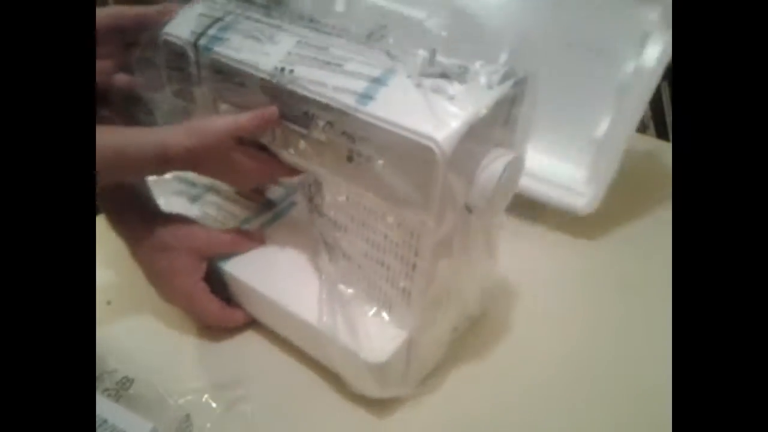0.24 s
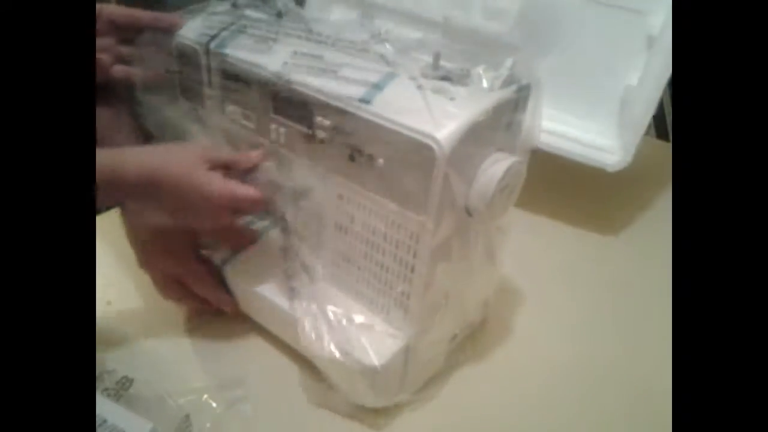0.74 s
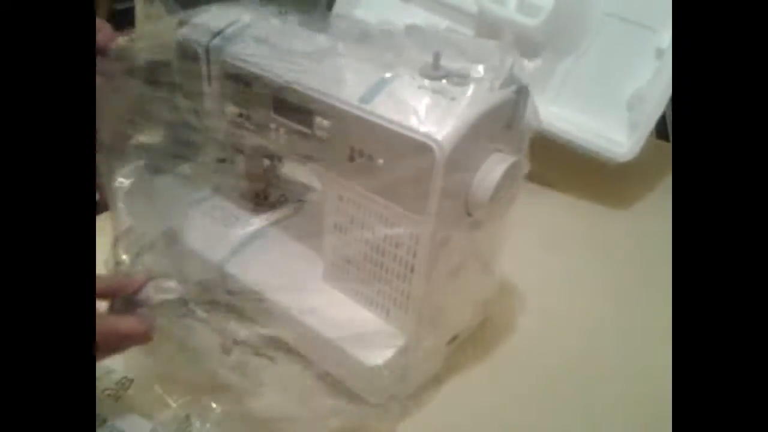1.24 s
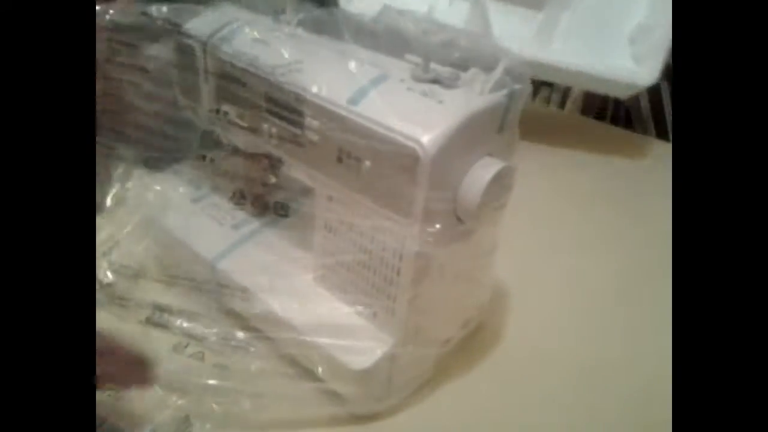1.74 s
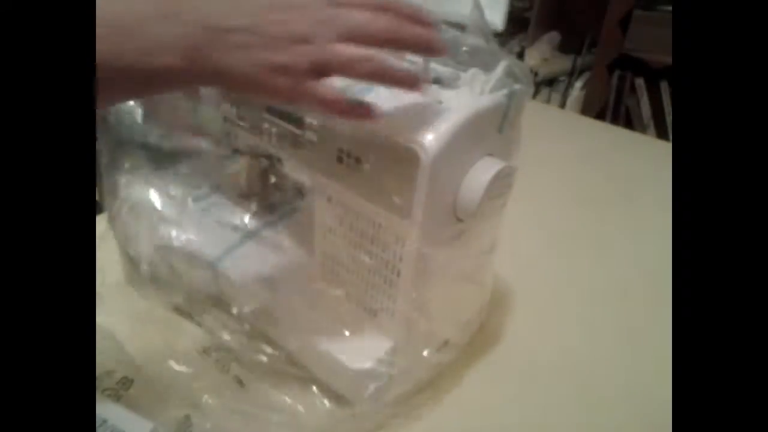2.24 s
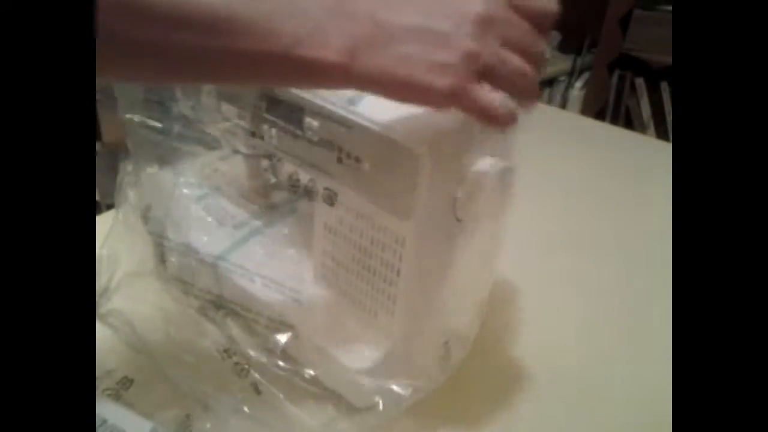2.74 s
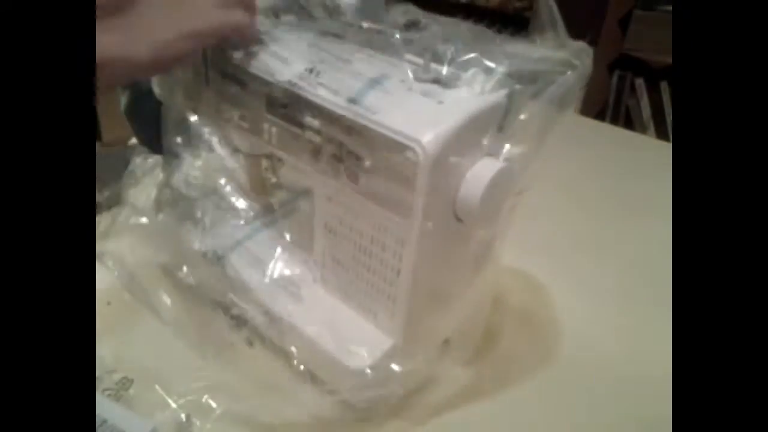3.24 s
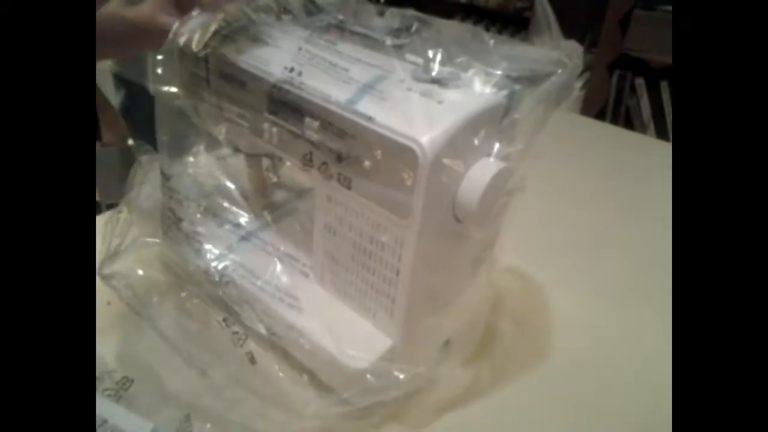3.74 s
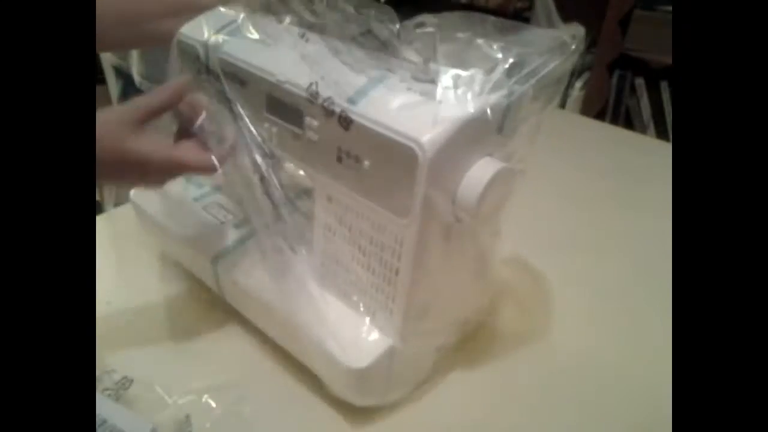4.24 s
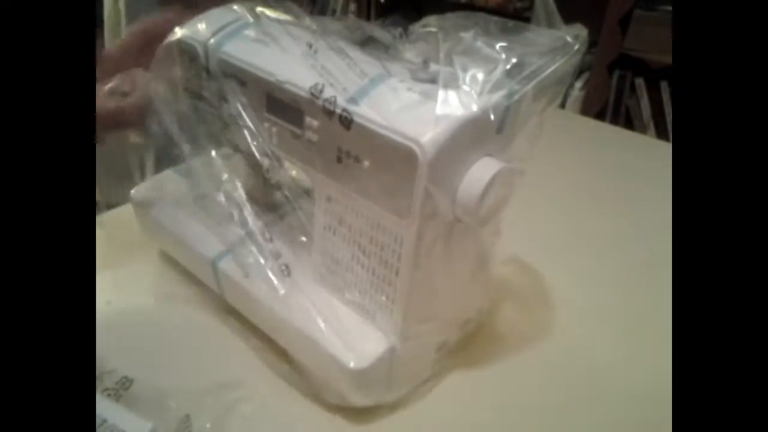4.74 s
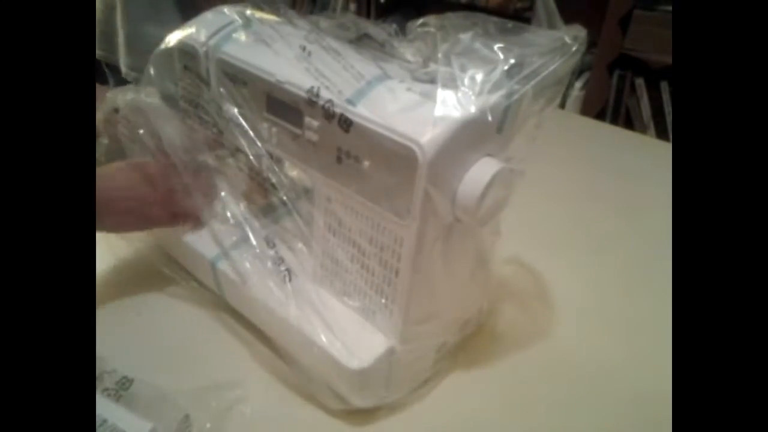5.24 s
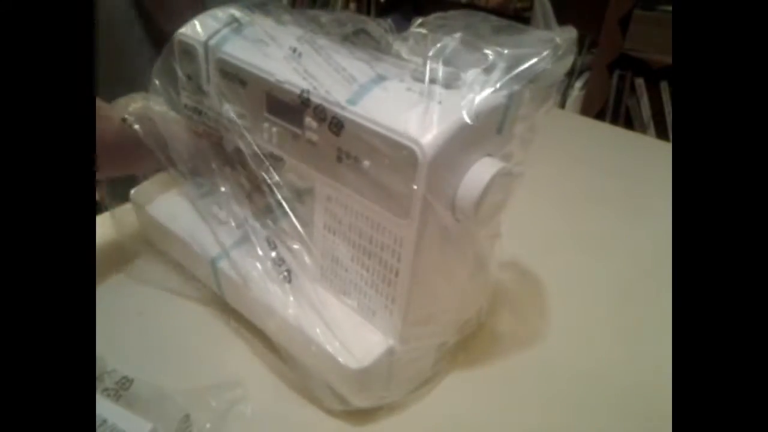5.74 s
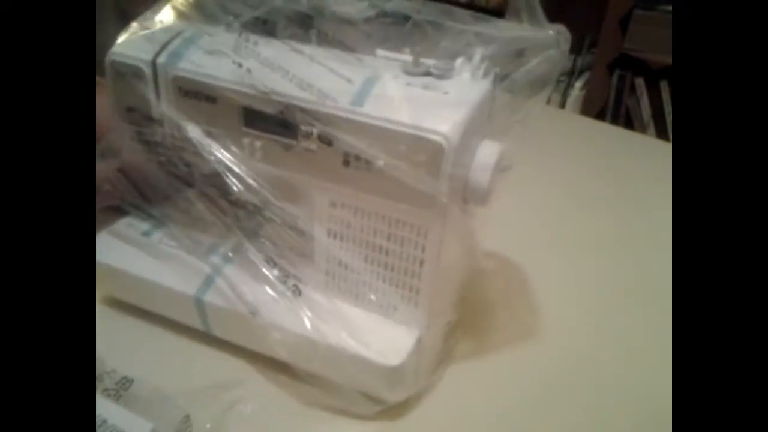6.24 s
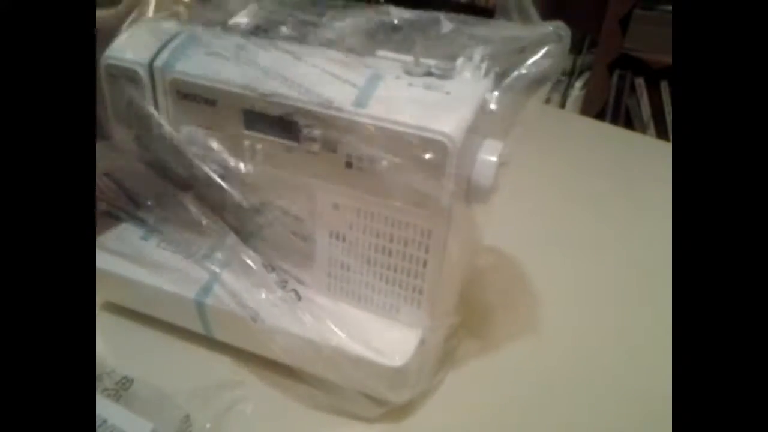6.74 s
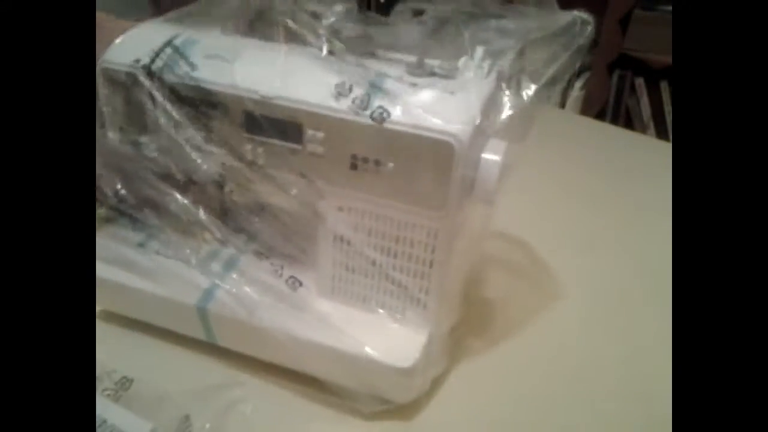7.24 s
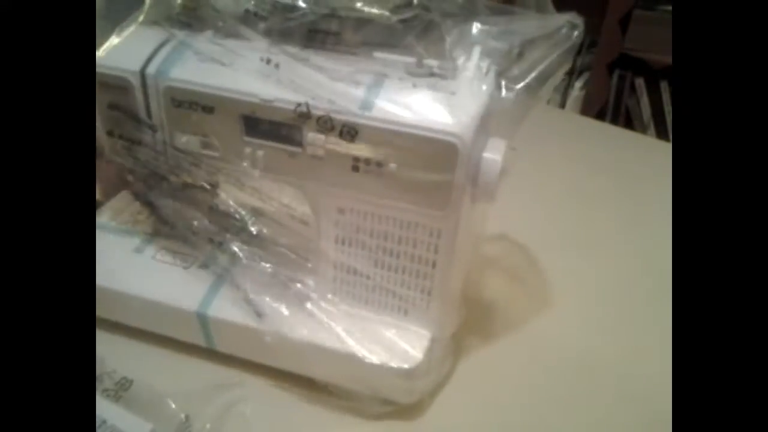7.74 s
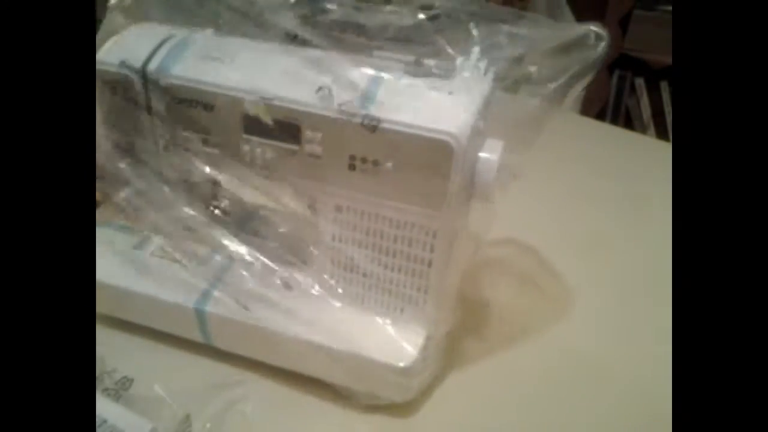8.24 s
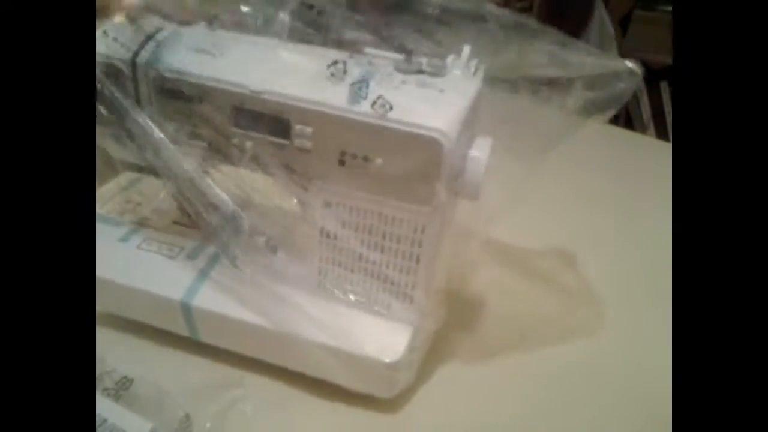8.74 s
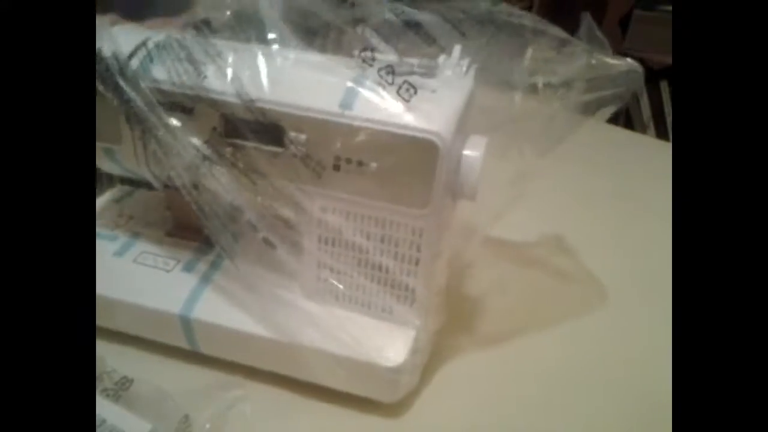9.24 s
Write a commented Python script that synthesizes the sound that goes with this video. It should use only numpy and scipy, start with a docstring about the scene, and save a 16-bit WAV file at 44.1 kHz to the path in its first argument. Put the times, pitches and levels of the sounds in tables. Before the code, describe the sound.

Hands work a thin plastic bag loose from a sewing machine on a table. The film crinkles and rustles throughout in uneven tugs, with sharp little snaps. A soft table thump comes at the start. From about halfway, the hollow housing is knocked and rubbed several times, and one hard tick sounds just before the end. The microphone is close, in a small quiet room.

```python
"""A table in a small room: hands lift a foam shell off a sewing machine and work its plastic bag loose.
Creases in the film buckle in little avalanches of clicks, over the friction hiss of film sliding on itself.
Now and then the hollow housing is knocked or rubbed and rings briefly in its damped modes, and the table
top booms. One hard tick sounds near the end, close to the microphone."""
import sys
import numpy as np
from scipy import signal
from scipy.fft import rfft, irfft
from scipy.io import wavfile
from scipy.ndimage import uniform_filter1d

SR = 44100
rng = np.random.default_rng(int(sys.argv[2]) if len(sys.argv) > 2 else 0)


def to_wav(sig):
    """Store sig (one row per channel, or 1-D mono) as 16-bit WAV at the path in sys.argv[1].

    Samples outside -1..1 are clipped; the rate is SR.
    """
    pcm = np.clip(np.atleast_2d(sig), -1, 1) * 32767
    pcm = np.round(pcm).astype(np.int16)
    wavfile.write(sys.argv[1], SR, pcm.T)  # frames by channels


N = 418950
TIME = np.arange(N) / SR

# modes of the hollow housing on the table: f/Hz, relative level/dB, T60/s
HOUSING_MODES = [(137, -10, 0.27), (200, -7, 0.11), (263, 0, 0.21), (298, -5, 0.08), (380, 2, 0.18),
                 (428, 5, 0.15), (533, -1, 0.18), (572, 0, 0.07), (640, 3, 0.07), (695, 1, 0.1),
                 (815, -1, 0.045), (885, -1, 0.1), (1060, -7, 0.1), (1545, -3, 0.12)]


def undb(db):
    """Amplitude ratio of a level: a factor of ten per 20 dB."""
    return 10 ** (np.asarray(db) / 20)


def rms(x):
    """Effective amplitude: the root of the mean square."""
    return np.sqrt(np.mean(x ** 2)) + 1e-12


def add(track, s, sound):
    """Superposition: a sound joins the track at s seconds."""
    start = max(int(s * SR), 0)
    part = sound[:max(N - start, 0)]
    track[start:start + len(part)] += part


def band(x, lo_hz, hi_hz, order=2):
    """Butterworth band-pass filtering."""
    return signal.sosfilt(signal.butter(order, [lo_hz, hi_hz], "band", fs=SR, output="sos"), x)


def colour(x, points, size=2048):
    """Minimum-phase filtering by a spectrum of (f/Hz, gain/dB) points."""
    hz, db = np.transpose(points)
    bin_hz = np.arange(size // 2 + 1) * SR / size
    gain = undb(np.interp(np.log(bin_hz + 1), np.log(hz), db))
    cepstrum = irfft(np.log(gain))
    cepstrum[1:size // 2] *= 2  # folding the cepstrum makes the filter causal
    cepstrum[size // 2 + 1:] = 0
    return signal.fftconvolve(x, irfft(np.exp(rfft(cepstrum))))[:len(x)]


def ring(modes, t, detune):
    """Free vibration: a sum of damped sinusoids, each slightly detuned at random."""
    out = 0
    for hz, db, t60 in modes:
        detuned_hz = hz * (1 + detune * rng.standard_normal())
        out = out + undb(db - 60 * t / t60) * np.sin(2 * np.pi * detuned_hz * t)
    return out


def walk(per_s):
    """Random modulation: straight lines between Gaussian values, with variance near 1."""
    return np.sqrt(3 / 2) * np.interp(TIME * per_s, np.arange(N), rng.standard_normal(N))


def curve(points):
    """Linear interpolation of (t/s, value) points at every sample."""
    return np.interp(TIME, *np.transpose(points))


def envelope(t, rise, hold, release):
    """Linear rise, hold and exponential decay."""
    return np.clip(t / max(rise, 1 / SR), 0, 1) * np.exp(-np.maximum(t - rise - hold, 0) / release)


def impulses(per_s, spread_db, cap):
    """Poisson process: impulses of either sign, their levels spread by a capped exponential law."""
    happens = rng.random(N) < per_s / SR
    size = undb(spread_db * np.minimum(rng.exponential(size=N), cap))
    return happens * size * rng.choice([-1, 1], N)


def room(x, wet_db=-1, t60=0.25):
    """Reverberation: dense reflections from table and walls decay after the direct sound."""
    t = TIME[:SR // 2]
    wash = rng.standard_normal(len(t)) * undb(-60 * t / t60) * (1 - np.exp(-t / 0.0026))
    return x + undb(wet_db) * signal.fftconvolve(x, wash / np.linalg.norm(wash))[:len(x)]


def room_hush():
    """Ambient noise: faint, steady and strongest near 500 Hz."""
    spectrum = [(25, -36), (80, -37), (160, -18), (500, -11), (2000, -22.5), (12000, -36)]  # f/Hz, gain/dB
    air = colour(rng.standard_normal(N), spectrum)
    return undb(-50) * air / rms(air)


def table_thumps():
    """Plate vibration: a padded weight sets the low modes of the table top booming."""
    # weight landing: t/s, gain/dB
    landings = [(0.23, -25.5), (0.399, -39), (9.327, -35)]
    # table top: f/Hz, relative level/dB, T60/s
    top_modes = [(123, -3, 0.34), (146.5, -1.5, 0.2), (179, -0.5, 0.15)]
    out = np.zeros(N)
    for s, db in landings:
        add(out, s, undb(db) * ring(top_modes, TIME[:SR // 2], detune=0.011))
    return band(out, 105, 260, order=3)


def housing_hum():
    """Friction-driven vibration: a slow drag sustains two housing modes, which waver and creep upward."""
    # sustained modes: starting f/Hz, level/dB
    tones = [(373, -40.5), (536, -47)]
    start_s, glide_per_s = 6.35, 0.16
    out, t = np.zeros(N), TIME[:SR // 2]
    drag = envelope(t, rise=0.07, hold=0.15, release=0.025)
    for hz, db in tones:
        pitch_hz = hz * (1 + glide_per_s * t + .008 * walk(30)[:len(t)])
        gain = undb(db + 2 * walk(23)[:len(t)])
        add(out, start_s, gain * drag * np.sin(2 * np.pi * np.cumsum(pitch_hz) / SR))
    return out


def contact(x, hz):
    """Selective excitation: the place and softness of a contact choose which range of modes rings."""
    return band(band(x, hz / 1.28, hz * 1.31, order=1), hz / 2.87, hz * 3.36, order=3)


def housing_knocks():
    """Impact excitation: a blow rings all the modes, each with a sign set by the spot that is struck."""
    # knocks and rebounds: t/s, level/dB, centre f/Hz
    blows = [(0.230, -20, 430), (0.237, -20, 270), (5.121, -22, 600), (5.127, -15.5, 430),
             (5.155, -24, 480), (5.659, -32, 600), (6.163, -24, 480), (6.262, -12.5, 720),
             (6.273, -11, 560), (6.282, -11.5, 380), (6.303, -18, 400), (7.763, -14.5, 620),
             (7.776, -12.5, 380)]
    out, t = np.zeros(N), TIME[:SR // 2]
    for s, db, hz in blows:
        modes = sum(rng.choice([-1, 1]) * ring([mode], t, detune=.006) for mode in HOUSING_MODES)
        body = contact(modes, hz) * (1 - np.exp(-t / 0.0014))  # the film pads the blow
        crunch = band(rng.standard_normal(len(t)), 880, 1700)  # and is crushed under it
        crunch = undb(-16) * crunch / rms(crunch) * np.exp(-t / 0.03)
        add(out, s, undb(db) * (body / rms(body[:SR // 60]) + crunch))
    return out


def housing_rubs():
    """Stick-slip friction: the grip catches and slips unevenly, ringing the housing, scraping the film."""
    # rubs: t/s, level/dB, hold/s, centre f/Hz, scrape re thud/dB
    strokes = [(0.118, -32, 0.048, 940, -13), (0.141, -38.5, 0.045, 387, -20),
               (0.258, -38.5, 0.087, 330, 3), (0.394, -31.5, 0.016, 980, -25),
               (3.671, -44.5, 0.073, 563, -11), (4.012, -21, 0.027, 583, -22),
               (4.025, -32, 0.0079, 230, -25), (4.164, -32, 0.084, 457, -8), (4.288, -33.5, 0.2, 334, -32),
               (4.397, -27.5, 0.017, 560, -24), (5.048, -34, 0.056, 520, -29),
               (5.19, -34.5, 0.015, 950, -11), (5.355, -17.5, 0.033, 720, -8),
               (5.36, -21.5, 0.0045, 245, -26), (5.422, -33, 0.049, 435, -6.5),
               (5.495, -42, 0.054, 426, -20), (6.756, -37, 0.014, 575, -29), (6.92, -34, 0.051, 560, -27),
               (6.939, -35.5, 0.05, 189, -23), (7.166, -39, 0.027, 654, -18),
               (7.849, -29.5, 0.14, 480, -16), (7.987, -23.5, 0.0061, 553, -14),
               (7.996, -19.5, 0.023, 408, -34), (8.062, -26, 0.066, 420, -39), (8.25, -30, 0.058, 594, -15),
               (9.323, -27, 0.013, 1060, -4), (9.335, -31, 0.026, 453, -2), (9.415, -36, 0.0045, 328, -10)]
    slips_per_s, release_s = 1200, 0.013
    out, t = np.zeros(N), TIME[:SR // 2]
    for s, db, hold, hz, scrape_db in strokes:
        rise = 0.052 * hold
        force = envelope(t, rise, hold - rise, release_s)
        slips = force * rng.choice([-1, 1], len(t)) * (rng.random(len(t)) < slips_per_s / SR)
        slips[0] += 2 * np.exp(-rise / 0.0053)  # a quick landing is a blow
        body = signal.fftconvolve(slips, ring(HOUSING_MODES, t, detune=.01))[:len(t)]
        panel = band(slips, 130, 850, order=3)  # heavily damped panels and the table top
        thud = contact(body / rms(body) + undb(-6) * panel / rms(panel), hz)
        scrape = band(force * rng.standard_normal(len(t)), 820, 1950)
        sound = thud / rms(thud) + undb(scrape_db) * scrape / rms(scrape)
        add(out, s, undb(db) * sound / rms(sound[:int((hold + release_s) * SR)]))
        rumble = band(rng.standard_normal(len(t)), 66, 304)  # each push also shakes the table
        add(out, s, undb(-36 + 0.23 * db) * force * rumble / rms(rumble))
    return out


def housing():
    """Resonance of the hollow housing under knocks and rubs, with a little reverberation."""
    return room(band(housing_knocks() + housing_rubs(), 125, 9000, order=4), wet_db=-17, t60=.27)


def hard_tick():
    """Brief contact excites high, heavily damped modes that die within milliseconds."""
    # ring of the tick: f/Hz, relative level/dB, T60/s
    tick_modes = [(2480, 8, 0.008), (2780, 8.5, 0.0087), (4420, 14.5, 0.007), (4680, -1, 0.005),
                  (7600, -3, 0.0055), (8500, 6, 0.0032)]
    start_s, peak_db, contact_s = 9.4066, -2, .0003
    out, t = np.zeros(N), TIME[:SR // 20]
    ringing = ring(tick_modes, t, detune=.01) * (1 - np.exp(-t / contact_s))
    sound = band(ringing, 1500, 14000, order=4)
    add(out, start_s, undb(peak_db) * sound / np.abs(sound).max())
    return out


def sheet_flaps():
    """Membrane resonance: a loose sheet whips taut and its crackle rings in the stretched film."""
    # flaps: t/s, level/dB, rise/s, hold/s
    whips = [(3.67, -37.5, 0.0086, 0.015), (3.751, -30.5, 0.0093, .01)]
    # taut sheet: f/Hz, relative level/dB, T60/s
    sheet_modes = [(660, -3, 0.055), (2650, -3, .03), (3610, 1, 0.08), (4060, 4, .05)]
    release_s = 0.028
    out, t = np.zeros(N), TIME[:SR // 4]
    for s, db, rise, hold in whips:
        crackle = envelope(t, rise, hold, release_s) * rng.standard_normal(len(t))
        ringing = signal.fftconvolve(crackle, ring(sheet_modes, t, detune=.01))[:len(t)]
        sound = band(ringing, 400, 6000)
        add(out, s, undb(db) * sound / rms(sound[:int((rise + hold + release_s) * SR)]))
    return out


def snap(hz, crack_db):
    """Snap-through buckling: a stiff crease flips with a short ping and a broadband crack."""
    t = TIME[:SR // 8]
    ping = np.sin(2 * np.pi * hz * t) * np.exp(-hz * t / 4.5)  # falls to 1/e in 4.5 cycles
    crack = band(rng.standard_normal(len(t)), hz / 2.2, 11500, order=1) * np.exp(-t / .0007)
    sound = band(ping + undb(crack_db) * crack, 900, 15000)
    return room(sound / np.abs(sound).max(), wet_db=-1.5, t60=0.11)


def stray_snaps(crisp_db):
    """Lesser creases buckle at random moments, as strongly as the film is being worked."""
    snaps_per_s = 22
    out = np.zeros(N)
    for when, pitch, size in rng.random((int(snaps_per_s * N / SR), 3)):
        db = crisp_db[int(when * N)] + 7.5 + 2.3 * min(-np.log(1 - size), 3)
        add(out, when * N / SR, undb(db) * snap(3200 * 3.3 ** pitch, crack_db=-3))
    return out


def loud_snaps():
    """The loudest creases release their elastic energy one by one."""
    # creases: t/s, direct peak level/dB, f/Hz, crack re ping/dB
    creases = [(0.122, -27, 3000, -10), (0.572, -25, 3900, 4), (1.023, -33, 9500, 0),
               (1.038, -25, 3800, -14), (1.218, -28, 8400, 3), (1.316, -24.5, 9500, -1),
               (1.371, -13, 3680, -25), (1.383, -17, 3680, -20), (1.522, -26, 3850, -14),
               (1.640, -20, 4000, -21), (1.878, -20.5, 3540, -14), (2.025, -20, 4200, -2),
               (2.105, -28, 9500, 0), (2.288, -22, 3500, -4), (2.335, -20, 3570, -14),
               (2.555, -31, 9000, 4), (2.572, -32, 9000, 4), (2.622, -30, 10500, 1), (2.788, -27, 3700, -8),
               (3.333, -28, 9700, -6), (3.338, -20, 3480, -18), (3.348, -25, 8900, -6),
               (3.685, -26, 4000, -12), (3.765, -24, 3630, -15), (4.095, -19, 9500, -2),
               (4.181, -21, 5430, 3), (4.621, -26, 12360, 2), (4.737, -31, 7500, 2), (4.829, -28, 9300, -4),
               (5.362, -14, 2900, -30), (5.901, -29, 5160, 2), (6.87, -17, 3800, -8),
               (7.228, -19, 3400, -5), (7.259, -23, 9000, 0), (7.448, -16.5, 3700, -16),
               (7.458, -21, 3800, -9), (7.649, -14, 3530, -10), (7.866, -18.5, 4200, 1),
               (7.920, -16, 3350, -17), (7.996, -15, 3480, -21), (8.352, -37, 9000, 0),
               (9.072, -29, 9000, 0), (9.287, -26, 3600, -6)]
    out = np.zeros(N)
    for s, db, hz, crack_db in creases:
        add(out, s, undb(db) * snap(hz, crack_db))
    return out


def sparkle(crisp_db):
    """Sharp creases buckle with tiny high ticks, at a rate that goes as the treble amplitude cubed."""
    hard_pull_db = -44
    per_band_per_s = 900 * undb(crisp_db - hard_pull_db) ** 3
    out = 0
    for hz in (9000, 10500, 12000, 13500):
        out = out + band(impulses(per_band_per_s, spread_db=0.5, cap=3.5), hz / 1.1, hz * 1.1)
    return undb(-40.5) * room(out)


def buckles():
    """Buckling avalanches: clicks come in bunches, and each size of facet rings in its own band."""
    base_per_s, facet_sizes = 2600, 24
    bunching = undb(1.5 * walk(90))
    out = 0
    for hz in np.geomspace(900, 13000, facet_sizes):
        clicks = impulses(base_per_s / facet_sizes * bunching, spread_db=-0.25, cap=3.7)
        out = out + room(band(clicks * bunching, hz / 1.25, hz * 1.25, order=1))
    return out / rms(out)


def handling():
    """Incoherent sources add in power: sliding plus tugs give the crinkle and top-treble levels in dB."""
    # steady sliding of the film: t/s, crinkle level/dB
    sliding = [(0.0, -41.5), (0.37, -39.5), (0.54, -49), (0.77, -36), (1.47, -33.5), (2.14, -37),
               (2.51, -53.5), (2.73, -33.5), (3.52, -42), (3.65, -61), (3.85, -35), (4.5, -31),
               (4.82, -39.5), (5.63, -45.5), (7.15, -31.5), (7.51, -39), (8.55, -35), (9.5, -38)]
    # tugs at the bag: t/s, crinkle level/dB, rise/s, hold/s, top treble re crinkle/dB
    tugs = [(0.093, -36, 0.038, 0.013, -12), (0.224, -35, 0.013, 0.024, -15),
            (0.967, -30.5, 0.023, 0.0078, -14), (1.209, -33, 0.011, 0.012, -6),
            (1.322, -32, 0.01, 0.028, -15), (1.422, -32.5, .012, 0.031, -14),
            (1.466, -27.5, 0.058, 0.007, -24), (1.89, -32, 0.022, 0.05, -17),
            (1.987, -37, 0.023, 0.025, -13), (2.078, -42, 0.02, 0.06, -12), (2.277, -38, 0.01, 0.14, -21),
            (2.512, -39.5, 0.024, 0.025, -24), (2.782, -38, .01, .03, -8),
            (2.846, -34, 0.015, 0.069, -11.5), (3.119, -35.5, 0.06, 0.18, -15.5),
            (3.32, -33, 0.011, 0.086, -15), (3.669, -32, 0.02, 0.014, -7.5),
            (3.723, -28.5, 0.04, 0.0099, -10.5), (4.005, -31.5, 0.017, 0.046, -15),
            (4.067, -26, 0.034, 0.037, -11), (4.155, -25.5, 0.03, 0.026, -19),
            (4.277, -30, 0.024, 0.025, -13), (4.395, -39, .01, 0.018, -6), (4.49, -29, 0.033, 0.045, -25),
            (4.715, -31.5, 0.025, 0.067, -15), (5.028, -36.5, 0.033, 0.1, -12.5),
            (5.169, -30, 0.035, 0.033, -15.5), (5.336, -30.5, 0.024, 0.022, -32),
            (5.41, -41, 0.016, 0.17, -9), (5.716, -39.5, 0.022, 0.05, -12),
            (5.897, -39.5, 0.0082, 0.12, -10), (6.092, -31, 0.13, 0.067, -10),
            (6.271, -29.5, 0.022, 0.26, -11.5), (6.339, -36, 0.014, 0.022, -1),
            (6.768, -33, 0.046, 0.027, -10), (6.845, -28.5, 0.049, 0.13, -12.5),
            (7.17, -32.5, 0.064, 0.003, -5.5), (7.449, -35.5, 0.0033, 0.008, -31),
            (7.53, -44, .012, .015, -3), (7.603, -35.5, 0.024, 0.26, -12.5),
            (7.835, -30, 0.034, 0.069, -14), (7.986, -39, 0.011, 0.003, -20),
            (8.066, -37.5, 0.0087, 0.08, -17), (8.136, -32.5, 0.061, 0.15, -16.5),
            (8.417, -36.5, 0.015, 0.15, -15), (8.698, -37, 0.027, 0.11, -19), (8.86, -40, .015, 0.088, -5),
            (8.983, -34, 0.044, 0.063, -11.5), (9.32, -43, 0.011, 0.014, -22)]
    # brief rests of the hands: middle t/s, level change/dB, half length/s
    pauses = [(0.552, -8, 0.01), (0.645, -7, 0.016), (0.913, -6, 0.011), (1.107, -4, 0.0091),
              (1.857, -7, 0.034), (2.21, -4, 0.061), (3.057, -6.5, 0.017), (4.812, -6.5, 0.015),
              (5.29, -5, 0.013), (5.64, -7, 0.011), (6.696, -2, 0.056), (7.50, -3.5, 0.033),
              (9.266, -7.5, 0.021)]
    crinkle_power = undb(curve(sliding)) ** 2
    crisp_power = crinkle_power * undb(-15) ** 2
    for s, db, rise, hold, treble_db in tugs:
        pull = undb(db) * envelope(TIME[:SR], rise, hold, release=0.023)
        add(crinkle_power, s, pull ** 2)
        add(crisp_power, s, (pull * undb(treble_db)) ** 2)
    rest_db = sum(db * np.exp(-((TIME - s) / half) ** 2) for s, db, half in pauses)
    uneven_db = .5 * walk(21)  # the film gives way unevenly
    return 10 * np.log10([crinkle_power, crisp_power]) + rest_db + uneven_db


def bag():
    """Buckling and sliding friction radiate from the film; the hands set how loud and crisp it is."""
    # spectrum of the film: f/Hz, gain/dB
    film_spectrum = [(85, -64), (160, 0), (380, 0.5), (650, 2.5), (1200, -7), (2100, -6.5), (3000, -0.5),
                     (3700, 3), (4400, -2), (5300, -10.5), (7200, -14), (9500, -7.5), (12000, -13.5),
                     (14500, -46)]
    # low flutter of slack film: t/s, level re crinkle/dB
    slack = [(0, -6.5), (.4, -2), (1.0, -10), (1.5, -9), (2.1, -10), (2.6, -7), (3.4, -7.5), (4.7, -8.5),
             (5.5, -5.5), (6.4, -5.5), (7.6, -8), (8.6, -8), (9.5, -4.5)]
    crinkle_db, crisp_db = handling()
    flutter_db = crinkle_db + curve(slack) + 1.8 * walk(14)
    hiss = rng.standard_normal(N) * undb(1.5 * walk(40) - 5)
    film = colour(buckles() + hiss, film_spectrum)
    # slack sheets flutter low, taut creases crack high
    flutter = band(band(film, 195, 20000, order=3), 100, 2000)
    crinkle = -band(film, 2000, 6500)
    crisp = band(film, 6500, 20000)
    out = 0
    for part, core_hz, db in ((flutter, (1100, 2000), flutter_db),
                              (crinkle, (2200, 6000), crinkle_db),
                              (crisp, (7000, 14000), crisp_db - 1)):
        running_rms = np.sqrt(uniform_filter1d(band(film, *core_hz) ** 2, SR // 14) + 1e-18)
        out = out + part / running_rms * undb(db)
    return undb(-3) * out + sparkle(crisp_db) + stray_snaps(crisp_db)


def scene():
    """Superposition of bag, housing, table and room at one close microphone."""
    film = bag() + loud_snaps() + sheet_flaps()
    return (film + housing() + table_thumps() + housing_hum() + hard_tick() + room_hush())[None]


def record(dry):
    """Clipping at full scale, then band-limiting by a steep low-pass filter."""
    top_hz = 14300
    return signal.sosfilt(signal.ellip(8, .2, 80, top_hz, fs=SR, output="sos"), np.clip(dry, -1, 1))


dry = scene()
out = record(dry)
to_wav(out)
```